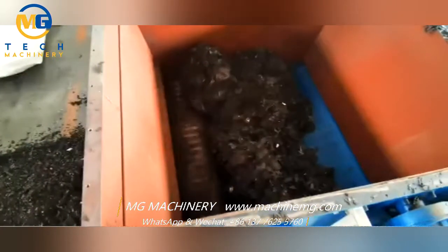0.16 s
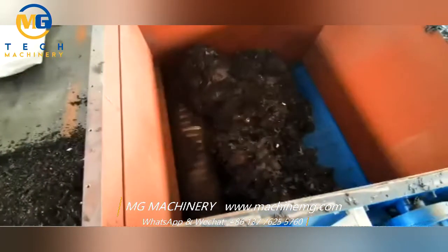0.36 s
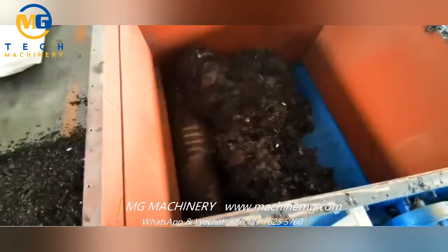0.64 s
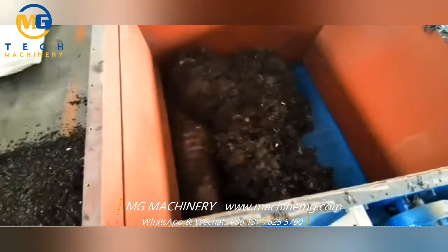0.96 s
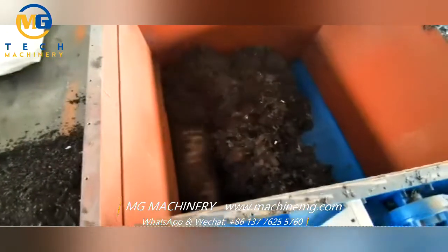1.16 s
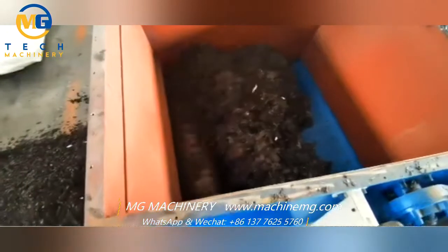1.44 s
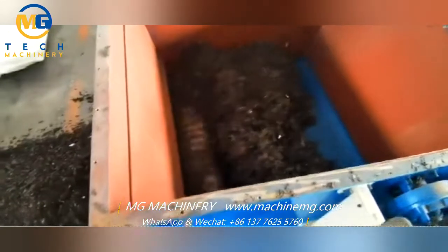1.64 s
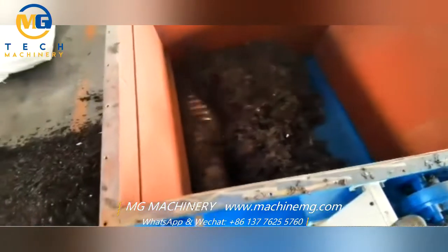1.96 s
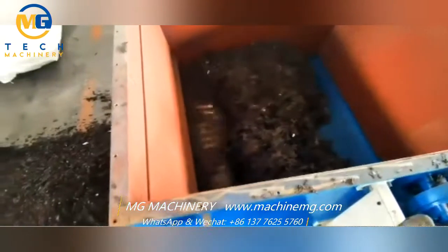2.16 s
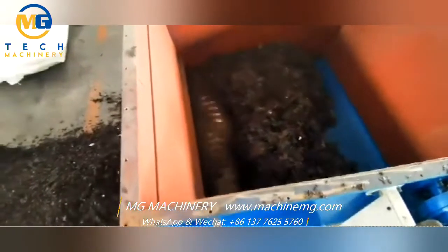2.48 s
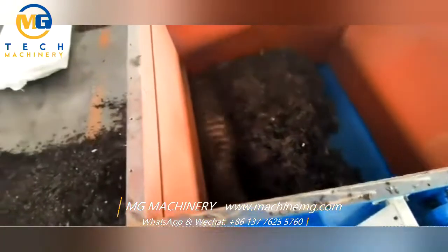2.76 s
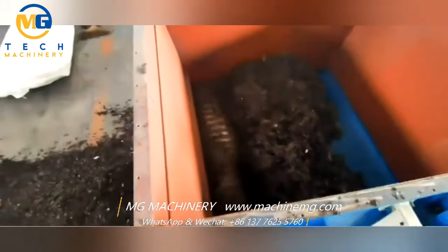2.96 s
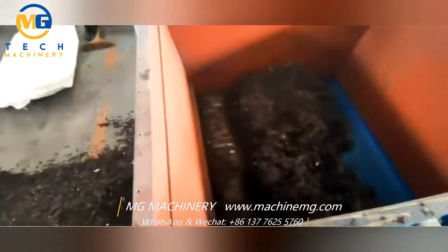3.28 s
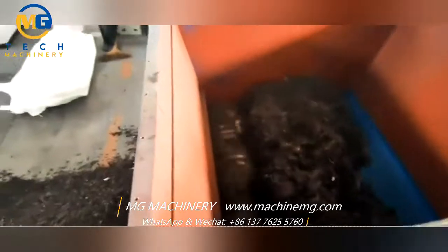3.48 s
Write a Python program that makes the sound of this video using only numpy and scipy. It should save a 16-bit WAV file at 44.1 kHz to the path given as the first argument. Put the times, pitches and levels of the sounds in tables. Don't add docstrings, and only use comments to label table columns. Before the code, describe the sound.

A slow shredder grinds steadily in a workshop, heard close from above its steel hopper; dull knocks and crisp cracks scatter throughout, growing louder late, over motor hum and thin gear whine, on a handheld phone.

```python
import sys
import numpy as np
from scipy import signal
from scipy.fft import rfft, irfft, next_fast_len
from scipy.io import wavfile

SR = 44100
rng = np.random.default_rng(int(sys.argv[2]) if len(sys.argv) > 2 else 0)


def boost(x):
    u = np.asarray(x, float) / 20
    return 10 ** u


def wrap_up_sound(samples):
    columns = np.atleast_2d(samples).T
    tamed = np.clip(columns, -1, 1)
    steps = np.round(tamed * 32767).astype(np.int16)
    wavfile.write(sys.argv[1], SR, steps)


N = 159642
CRACK_LOW_HZ = 3410


def rms_one(x):
    return x / np.sqrt(np.mean(x ** 2) + 1e-20)


def in_time(rows):
    s, *columns = np.transpose(rows)
    return [np.interp(np.arange(N) / SR, s, column) for column in columns]


def drift(rate):
    r = np.exp(-80 * np.pi * rate / SR)
    noise = rng.standard_normal(N // 40 + 2002)
    slow = signal.lfilter([1], [1, -2 * r, r * r], noise)[2000:]
    return np.interp(np.arange(N) / 40, np.arange(len(slow)), rms_one(slow))


def colour(x, points):
    size = next_fast_len(N + 8192)
    hz, db = np.transpose(points)
    bins_hz = np.arange(size // 2 + 1) * SR / size
    log_gain = np.interp(np.log(bins_hz + 1), np.log(hz), db) * np.log(10) / 20
    cepstrum = irfft(log_gain, size)
    cepstrum[1:size // 2] *= 2
    cepstrum[size // 2 + 1:] = 0
    return irfft(rfft(x, size) * np.exp(rfft(cepstrum)), size)[:N]


def cut(x, hz, kind):
    return signal.sosfilt(signal.butter(2, hz, kind, fs=SR, output="sos"), x)


def cut_twice(x, hz, kind):
    return cut(cut(x, hz, kind), hz, kind)


def ring(clicks, hz, t60):
    r, w = boost(-60 / (t60 * SR)), 2 * np.pi * hz / SR
    return signal.lfilter([0, np.sin(w)], [1, -2 * r * np.cos(w), r * r], clicks + 1e-18)


def tone(hz, width_hz, lag=0, wobble_db=2.0):
    phase = 2 * np.pi * np.cumsum(hz + width_hz * drift(8.55) / 2) / SR
    return np.sqrt(2) * boost(wobble_db * drift(24)) * np.sin([phase, phase + lag])


def grains(rate, spread_db):
    size = boost(spread_db * np.minimum(rng.exponential(1, N), 3)) * rng.standard_normal(N)
    return size * (rng.random(N) < rate / SR)


def shade(x, hz, db):
    top = signal.sosfiltfilt(signal.butter(4, hz, "high", fs=SR, output="sos"), x)
    return x + (boost(db) - 1) * top


def hopper_boom(boom_db):
    # frequency in Hz, level in dB per Hz.
    frame = [(13, -48), (22, -29), (96, -9.5), (152, -1.5), (307, -2.5), (493, -13.5), (572, -9.5),
             (707, -18), (1100, -19), (1430, -28.5), (2420, -120)]
    # frequency in Hz, level in dB, t60 in seconds.
    plates = [(102.6, -9.5, 0.066), (182, -10.5, 0.069), (312, -5, 0.039), (326.6, -1.5, 0.095),
              (374.3, -6, 0.14), (409, -10, 0.071)]
    tumbles_per_s = 280
    rumble = rms_one(colour(rng.standard_normal(N), frame)) * boost(1.0 * drift(39))
    lumps = rms_one(sum(boost(db) * ring(grains(tumbles_per_s / 2, 3.2), hz, t60)
                        for hz, db, t60 in plates))
    mid = boost(boom_db) * (boost(-3) * rumble + boost(-5.5) * cut(lumps, 700, "low"))
    side = rms_one(colour(rng.standard_normal(N), frame))
    side = boost(-11.5) * (cut(side, 553, "high") + 0.42 * side)
    return mid, boost(boom_db) * side


def hopper_knocks():
    # start in seconds, peak in dB, pitch in Hz.
    blows = [(0.164, -20, 215), (0.525, -20, 210), (0.632, -20, 284), (0.842, -18, 150), (0.976, -23, 165),
             (1.089, -24, 242), (1.194, -20, 207), (1.223, -19.5, 194), (1.349, -15, 151),
             (1.387, -31, 212), (1.52, -18.5, 151), (1.701, -17, 445), (1.738, -19.5, 397),
             (1.80, -23.5, 177), (1.876, -17.5, 292), (1.924, -19.5, 354), (1.965, -21.5, 370),
             (2.008, -17, 302), (2.083, -21, 156), (2.338, -17.5, 191), (2.477, -22.5, 334),
             (2.662, -12, 332), (2.675, -25, 310), (2.775, -22, 310), (2.947, -17, 342),
             (3.119, -22.5, 307), (3.168, -18.5, 151), (3.215, -25, 293), (3.234, -15.5, 304),
             (3.483, -20.5, 293)]
    t60_s, trim_db = 0.08, -5
    out = np.zeros(N + SR)
    t = np.arange(SR // 4) / SR
    for s, db, hz in blows:
        wave = np.sin(2 * np.pi * hz * t) + 0.17 * np.sin(2.6 * np.pi * hz * t)
        start = int(s * SR)
        out[start:start + len(t)] -= boost(db + trim_db - 60 * t / t60_s) * wave
    return cut_twice(cut(out[:N], 700, "low"), 103, "high")


def hopper(boom_db):
    mid, side = hopper_boom(boom_db)
    knocks = hopper_knocks()
    left_lead_s = 0.00003
    lead = left_lead_s * SR * np.gradient(mid + knocks)
    return mid + (side + lead) * [[1], [-1]], knocks


def machine_tones():
    # time in seconds, level in dB.
    whine = [(0.0, -47.5), (0.02, -49.5), (0.42, -52.5), (0.54, -45), (0.57, -51), (0.96, -48),
             (1.38, -55.5), (1.42, -47.5), (1.51, -56), (1.54, -45.5), (1.73, -58.5), (2.46, -51.5),
             (2.61, -69), (2.72, -54), (2.75, -67), (3.22, -54), (3.57, -60.5), (3.62, -49)]
    whine_db, = in_time(whine)
    hum = boost(-43.5) * tone(151, 2.73, wobble_db=2.2)
    pump = boost(whine_db) * tone(1710, 6.65, 1.23, 1.6)
    plate = boost(whine_db - 6) * tone(575, 5.5, wobble_db=3.0)
    return hum + pump + plate


def gear_mesh():
    # multiple of the mesh rate, level in dB.
    partials = [(3, -41), (6, -48), (9, -23), (18, -22.5), (20, -19.5), (21, -38), (26, -27), (30, -32)]
    mesh_hz = 320.9
    return sum(boost(db) * tone(k * mesh_hz, k * 1.513, lag=k, wobble_db=5.0) for k, db in partials)


def tooth_swell():
    rotor_hz, teeth, pairs = 5.84, 6, 3
    turn = 2 * np.pi * rotor_hz * np.arange(N) / SR
    tooth_db = -0.1 * np.cos(teeth * turn - 2 * np.pi * 0.43)
    pair_db = 0.03 * np.cos(pairs * turn - 2 * np.pi * 0.85)
    return tooth_db + pair_db + 0.62 * drift(27) + 1.2 * drift(7.2)


def grinding(shade_db):
    # centre in Hz, width in Hz, start and end in seconds.
    nulls = [(1430, 210, 0.14, 1.32), (1935, 120, 1.43, 2.64)]
    null_depth, null_fade_s = 0.65, 0.1
    swell_db = tooth_swell()
    grains_per_s = 3500 * boost(swell_db)
    bursts = signal.lfilter([1], [1, -0.985], np.abs(grains(grains_per_s / 10, 2.5)))
    grit = rms_one(cut(bursts * rng.standard_normal((2, N)), CRACK_LOW_HZ, "high"))

    top = cut(rng.standard_normal((2, N)), CRACK_LOW_HZ, "high")
    own_db = np.array([0.84 * drift(25), 1.0 * drift(23)])
    middle = cut(rng.standard_normal((2, N)), CRACK_LOW_HZ, "low")
    middle_db = 0.98 * swell_db + 0.36 * shade_db + 0.61 * drift(6.6)
    hiss = boost(swell_db + own_db) * top + boost(middle_db) * middle

    t = np.arange(N) / SR
    for hz, width_hz, start, end in nulls:
        on = np.clip(np.minimum(t - start, end - t) / null_fade_s + 1, 0, 1)
        band = signal.lfilter(*signal.iirpeak(hz, hz / width_hz, SR), hiss)
        hiss = hiss - null_depth * on * band
    return boost(-9) * grit + boost(0.5) * hiss + gear_mesh()


def cracks():
    # start in seconds, peak in dB, left over right in dB, decay in seconds.
    snaps = [(0.126, -23, -4.5, 0.0066), (0.2905, -27, 7, 0.004), (0.357, -22, -6, 0.003),
             (0.5554, -23, 0, 0.0094), (0.7282, -28, 0, 0.003), (0.7473, -16, -1, 0.0026),
             (0.922, -24, -14, 0.0038), (0.9558, -30, -9, 0.0036), (1.0076, -35, -2, 0.003),
             (1.069, -24, -6, 0.0085), (1.1106, -18, -2, 0.0031), (1.1672, -22, -7, 0.0032),
             (1.2454, -16, -3, 0.002), (1.267, -30, -4, 0.003), (1.3148, -23, -13, 0.0044),
             (1.3992, -24, -4, 0.003), (1.517, -20.5, -4.0, 0.0037), (1.6282, -17, 2, 0.0036),
             (1.8034, -27, -1, 0.0035), (1.8347, -21, -3, 0.004), (1.8615, -21.5, -3, 0.0049),
             (2.2052, -30.5, -19, 0.0058), (2.379, -20.5, 13, 0.0034), (2.4336, -21, -1, 0.0069),
             (2.4873, -19, -2, 0.0034), (2.657, -19, -5, 0.003), (2.714, -25, -19, 0.0037),
             (2.7458, -11.5, 0, 0.0032), (2.787, -29, -10, 0.003), (2.8085, -25, -18, 0.0048),
             (2.8863, -32, -11, 0.0032), (2.9157, -13, 0, 0.0052), (2.9645, -27, -9.0, 0.0043),
             (3.086, -16.5, 1, 0.0046), (3.1123, -23, -8, 0.003), (3.144, -23.5, -8.5, 0.0044),
             (3.217, -16, 6, 0.0015), (3.2644, -13.5, 1, 0.0039), (3.303, -22, 5, 0.003),
             (3.318, -24.5, -15, 0.004), (3.356, -34, 6, 0.0015), (3.431, -23, -12, 0.0028),
             (3.456, -26, 5, 0.002), (3.4953, -22.5, -17, 0.0021)]
    trim_db, pan_trim_db = -3, 4
    rise_s, spike_s, split_s = 0.0006, 0.00075, 0.0045
    decay_share = np.array([[0.76], [1]])
    env = np.zeros((2, N + SR))
    t = np.arange(SR // 8) / SR
    rise = 1 - np.exp(-t / rise_s)
    spike = np.exp(-t / spike_s)
    for s, db, pan_db, decay in snaps:
        gain = boost(db + trim_db + (pan_db + pan_trim_db) * np.array([[0.5], [-0.5]]))
        shape = (np.exp(-t / decay / decay_share) + spike) * rise
        for lag, share in [(0, 1), (split_s, 0.36 * decay_share)]:
            i = int((s + lag) * SR)
            env[:, i:i + len(t)] += share * gain * shape
    steep = signal.butter(10, 10800, fs=SR, output="sos")
    burst = signal.sosfilt(steep, env[:, :N] * np.tanh(rng.standard_normal((2, N))))
    body = signal.lfilter(*signal.iirpeak(4000, 4.0, SR), burst)
    return cut_twice(burst + 0.61 * body, CRACK_LOW_HZ, "high")


def ports(x, shade_db):
    # frequency in Hz, gain in dB.
    left_port = [(1100, -10), (4000, -22.5), (6000, -15.5), (7200, -13), (8300, -3), (9500, -15.5),
                 (12000, -29.5), (15000, -28)]
    right_port = [(1100, -8), (3500, -12.5), (5800, 0), (6600, -4), (8500, -13.5), (9300, -21.5),
                  (11000, -27), (12000, -78)]
    flat = rng.standard_normal(N)
    out = []
    for sound, port, db in [(x[0], left_port, 3), (x[1], right_port, 5)]:
        port = port + [(16000, port[-1][1] - 14)]
        treble = cut_twice(sound, 1130, "high")
        out.append(boost(db) * colour(treble, port) / np.std(colour(flat, port)))
    out[0] = shade(out[0], 4650, shade_db)
    out[0] = shade(out[0], 11600, 1.1 * np.minimum(shade_db, 0))
    return np.array(out)


def clang():
    start_s, hz, t60_s = 1.068, 2360, 0.058
    hit = np.zeros(N)
    hit[[int(start_s * SR), int((start_s + 0.018) * SR)]] = boost(-37)
    return ring(hit, hz, t60_s) + 0.5 * ring(hit, 1.04 * hz, t60_s)


def ducking():
    # start in seconds, depth in dB, hold in seconds.
    dips = [(1.236, 6, 0.0091), (2.738, 8, 0.017), (2.908, 2.5, 0.023), (3.099, 8, 0.006),
            (3.26, 3.5, 0.013), (3.36, 1, 0.014), (3.584, -0.5, .04)]
    attack_s, release_s = 0.004, 0.022
    t, db = np.arange(N) / SR, 0
    for s, depth_db, hold in dips:
        fall = np.clip((t - s) / attack_s, 0, 1)
        recovery = np.exp(-np.maximum(t - s - hold, 0) / release_s)
        db = db - depth_db * fall * recovery
    return boost(db)


def scene():
    # time in seconds, boom in dB, grind in dB, left treble shade in dB.
    load = [(0.0, -33.5, -42, 15.5), (0.12, -35.5, -37.5, 14), (0.2, -34, -38, 12),
            (0.24, -35, -37.5, 12.5), (0.43, -35.5, -38, 14), (0.9, -34.5, -37, 13.5),
            (1.4, -34, -36.5, 12), (2.0, -33.5, -36, 13), (2.29, -34.5, -36.5, 7), (2.65, -34.5, -36, 9.5),
            (2.66, -31.5, -36.5, 10.5), (2.74, -35.5, -38.5, 8), (3.2, -36, -36.5, 9.5),
            (3.4, -36.5, -39.5, 6), (3.5, -35.5, -40, 10.5), (3.56, -34.5, -39.5, 6.5), (3.62, -43, -42, 9)]
    boom_db, grind_db, shade_db = in_time(load)
    shade_db = shade_db - 12.5
    duck = ducking()
    boom, knocks = hopper(boom_db)
    bed = duck * (boom + machine_tones() + knocks + clang())
    grind = duck * boost(grind_db) * grinding(shade_db)
    return bed + ports(grind + cracks(), shade_db)


def low_pass(x):
    return signal.sosfilt(signal.butter(12, 15730, fs=SR, output="sos"), x)


def record(dry):
    overload = 0.45
    x = overload * np.tanh(dry / overload)
    x = cut(x, 64, "high")
    x = cut_twice(x, 13800, "low")
    return low_pass(x)


dry = scene()
out = record(dry)
wrap_up_sound(out)
```